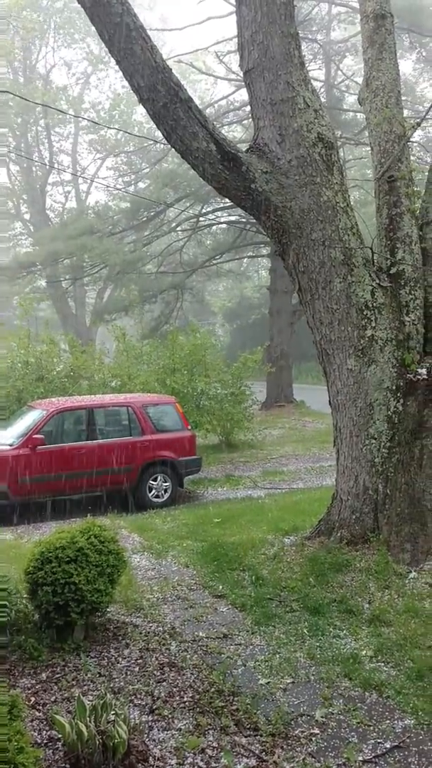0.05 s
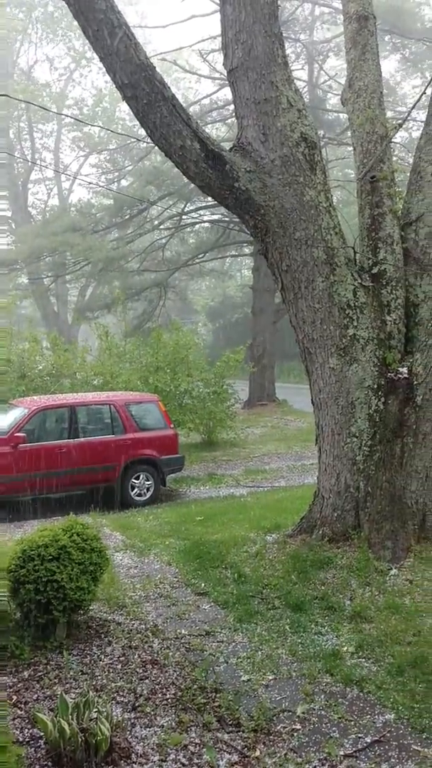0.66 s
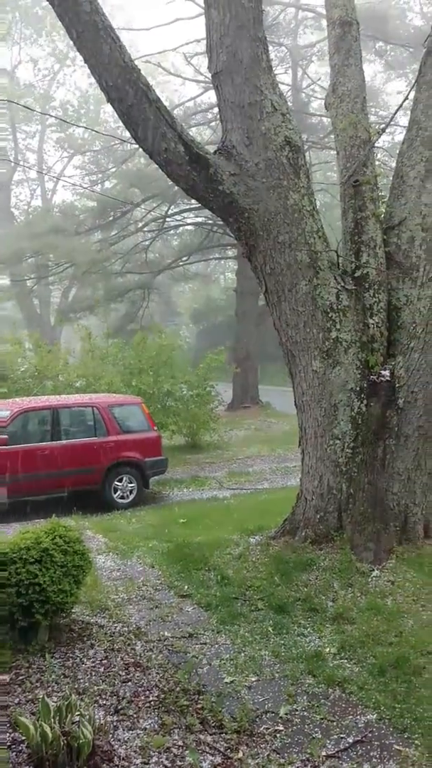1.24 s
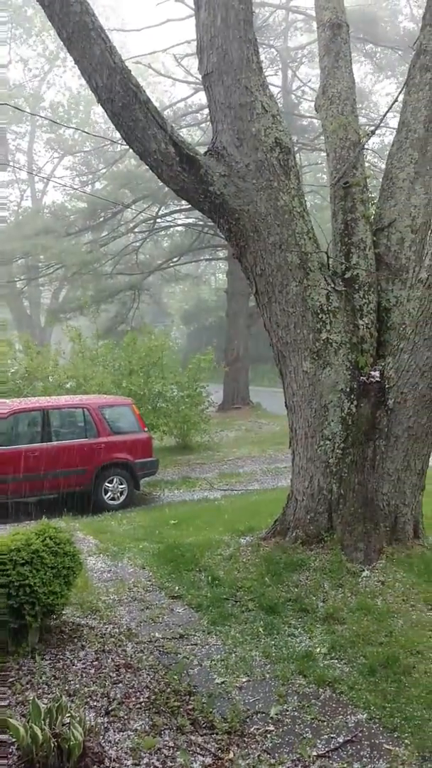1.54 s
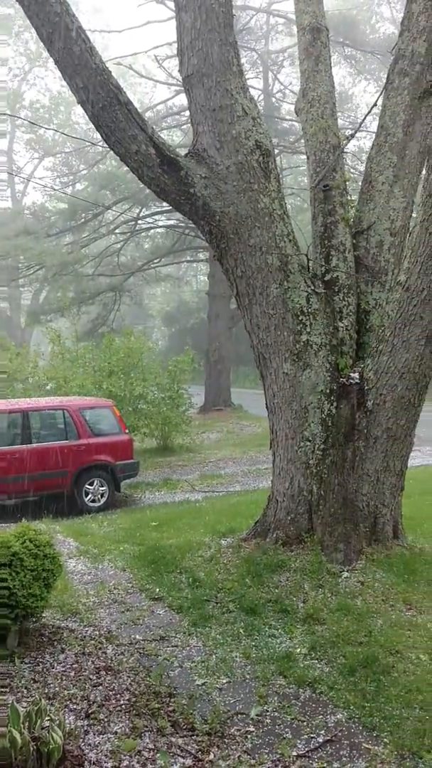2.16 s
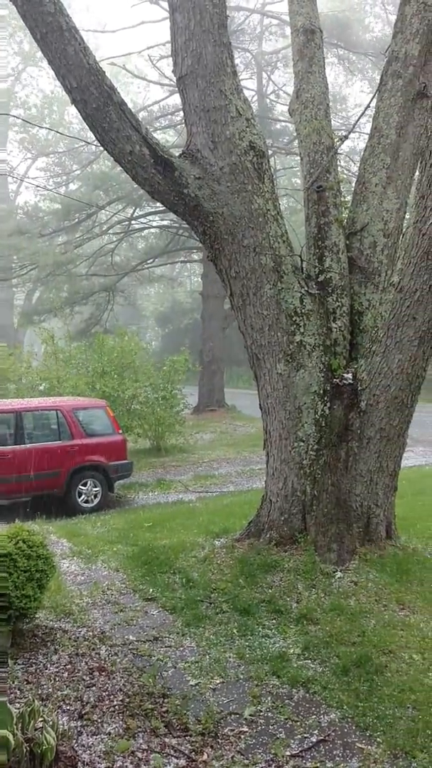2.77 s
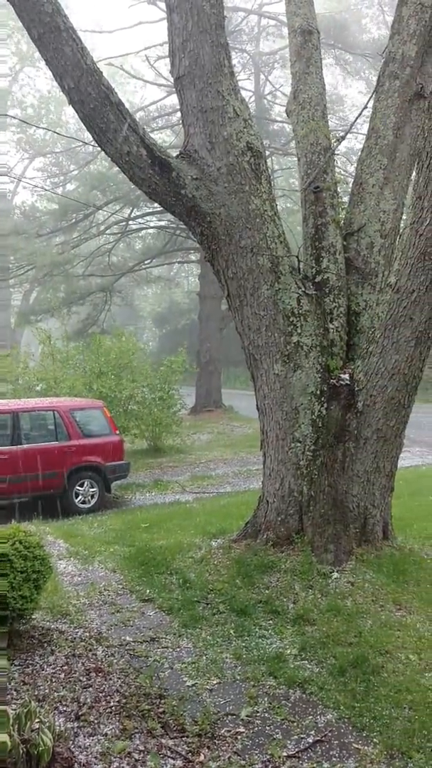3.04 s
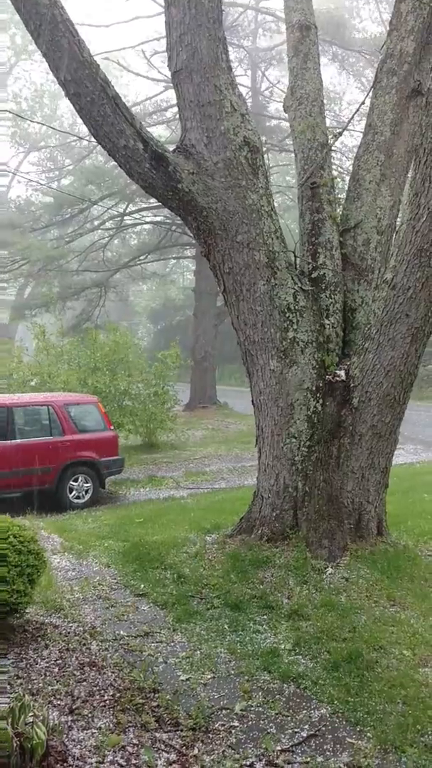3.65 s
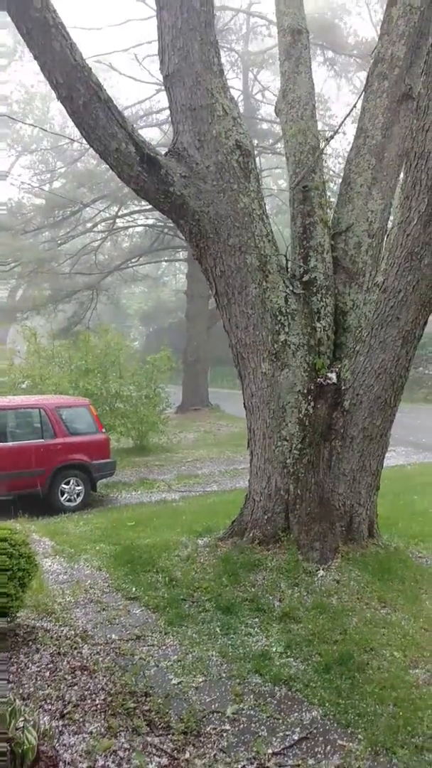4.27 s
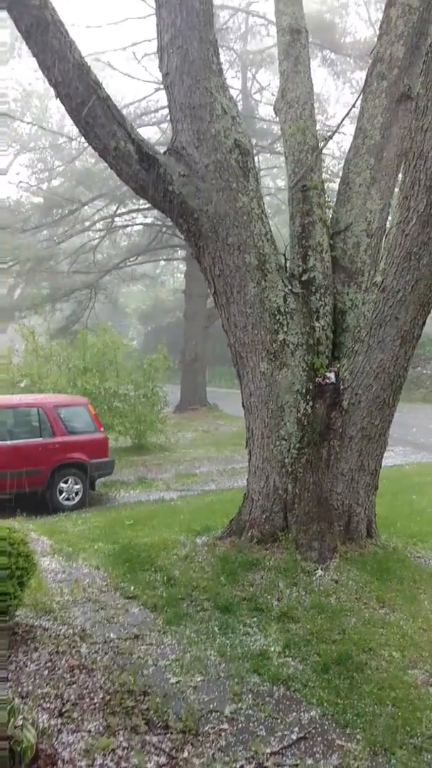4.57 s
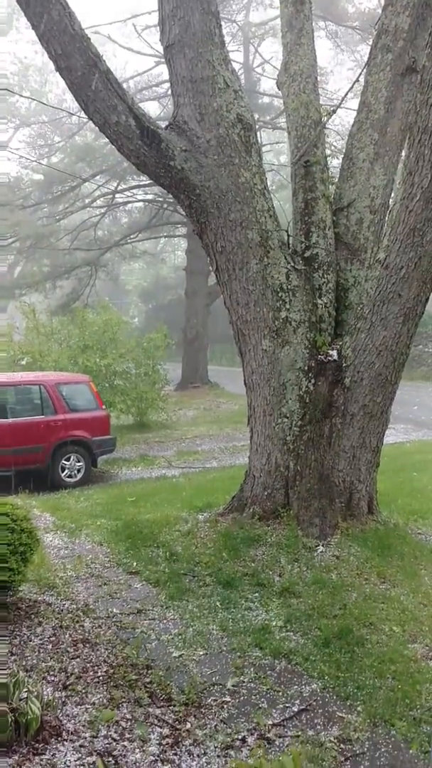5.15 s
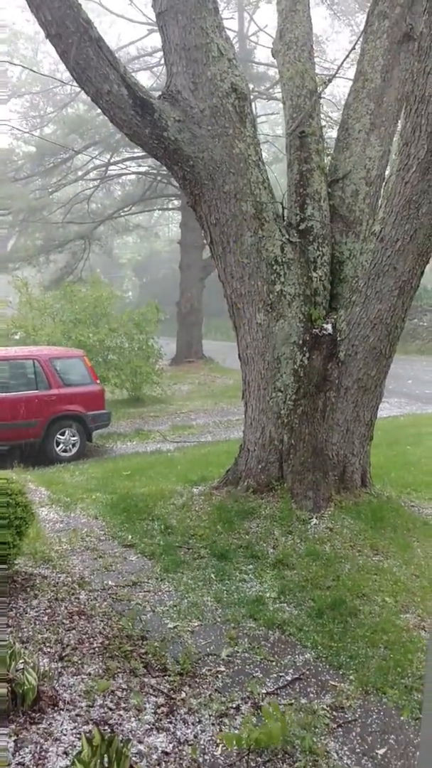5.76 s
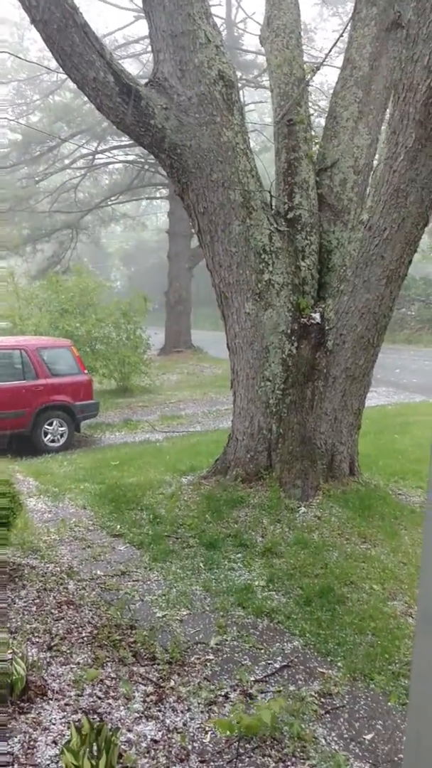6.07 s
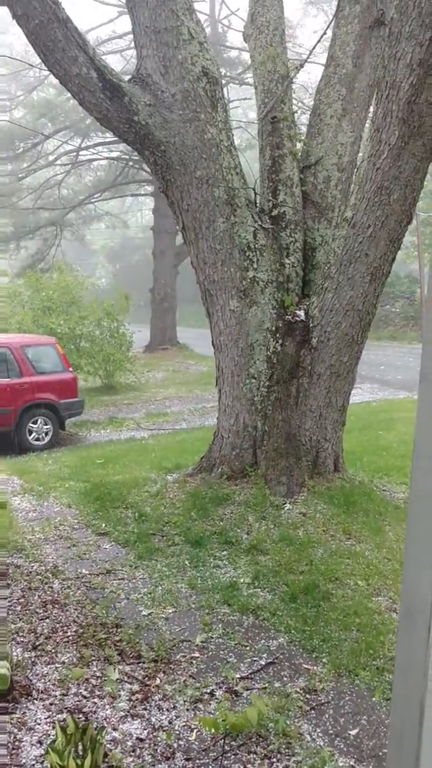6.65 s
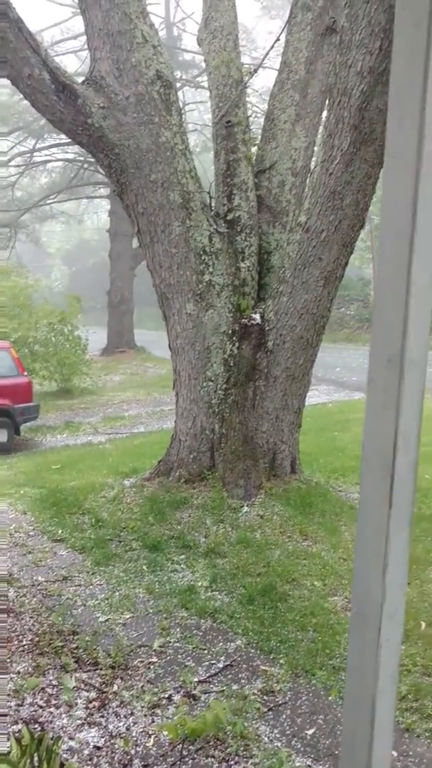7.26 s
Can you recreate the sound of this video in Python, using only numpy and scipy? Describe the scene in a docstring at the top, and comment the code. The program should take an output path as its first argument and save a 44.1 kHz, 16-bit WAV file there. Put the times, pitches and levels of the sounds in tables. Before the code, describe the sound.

A dense hailstorm pours onto a yard and booms on the roof overhead while single hailstones snap sharply against hard surfaces nearby.

```python
"""Heavy hail and rain on a yard, heard from a porch. From the start, countless small hits hiss on leaves,
patter on the ground and drum on the roof, while close stones crack on something hard. Sharp cracks
make the automatic volume control dip, and the downpour slowly swells back. After a second, big stones
also thud on the roof and others knock on something hollow. The roof's boom grows for three seconds as
the microphone comes under it. Near six seconds the biggest stone clinks; at the end the hail eases."""
import sys
import numpy as np
from scipy import signal
from scipy.fft import rfft, irfft, next_fast_len
from scipy.io import wavfile

SR = 44100
rng = np.random.default_rng(int(sys.argv[2]) if len(sys.argv) > 2 else 0)


def unload_wav(signal):
    """Save mono or channel-first audio to the path in sys.argv[1] as 16-bit WAV at rate SR, clipped to [-1, 1]."""
    wavfile.write(
        sys.argv[1],
        SR,
        np.round(np.clip(np.atleast_2d(signal).T, -1, 1) * 32767).astype(np.int16),
    )


N = 331191
SIZE = next_fast_len(N + 4096)
HZ, TIME = np.fft.rfftfreq(SIZE, 1 / SR), np.arange(N) / SR
CONTACT_S = .00036  # a hit peaks this long after it begins
PORT_GAP_S = .000389  # sound's travel time between the microphone's two openings, or ports

# close hailstones: t/s, ring level/dB, f/Hz, snap level/dB, click level/dB, side (-1 left, 1 right)
CLOSE_STONES = [(0.152, -26, 1900, -9.5, -12, -1.0), (0.2154, -16.0, 3900, -22.0, -30, 0.1),
                (0.3467, -18.0, 3300, -17, -30, 0.6), (0.7289, -18, 4600, -24.0, -30, -0.3),
                (0.8091, -23, 4600, -24.0, -30, 0.2), (0.8646, -22, 4600, -17, -11.5, 0.8),
                (1.206, -17, 2800, -12, -30, -0.7), (1.2516, -25, 4600, -14, -30, 0.7),
                (1.4433, -23, 4570, -15, -15, 0.8), (1.4614, -19, 4600, -24.0, -32, 0.5),
                (1.8788, -15, 2800, -24.0, -16, 0.8), (1.9427, -24.0, 7300, -19.0, -10.5, 0.4),
                (1.9876, -20.0, 2800, -18.0, -30, 0.6), (2.1235, -19, 3900, -24.0, -30, 0.2),
                (2.1633, -21, 4600, -24.0, -30, 0.8), (2.2777, -13.5, 4600, -21.0, -25, 0.8),
                (2.307, -17, 4600, -24.0, -30, 0.4), (2.4174, -15, 4600, -10.0, -12.5, 0.5),
                (2.6017, -22.0, 5400, -15, -30, 0.8), (2.6946, -13, 6300, -27, -13.5, 0.8),
                (2.7882, -7.5, 3900, -19, -11, 0.5), (3.0792, -21, 3300, -23.0, -30, -0.5),
                (3.1077, -15, 7300, -9, -9, 0.1), (3.7443, -17.0, 5400, -24.0, -30, 0.8),
                (3.78, -22, 5400, -14.0, -10.5, 0.4), (3.797, -16, 2800, -24.0, -30, 0.5),
                (3.9071, -22, 4600, -26, -30, 0.0), (4.427, -18, 4600, -24.0, -30, 0.2),
                (4.9786, -17, 6300, -28, -15.5, 0.5), (5.0515, -28, 5400, -27, -16, 0.3),
                (5.1785, -17, 3920, -24, -30, 0.4), (5.3996, -14, 5400, -21, -10, 0.7),
                (5.4644, -13, 3900, -12, -30, 0.2), (5.7736, -11, 3900, -18.0, -25, 0.5),
                (5.7874, -16, 3930, -17, -30, 0.8), (6.1392, -5.5, 4520, -12, -9.5, 0.3),
                (6.362, -23.0, 1900, -15, -30, 0.4), (6.6143, -18.0, 3870, -14, -25, 0.7),
                (6.7348, -18, 5400, -11.5, -13.5, 0.7), (7.0047, -16, 3210, -24.0, -30, 0.8),
                (7.0364, -18.0, 2800, -12, -33, -0.7), (7.0681, -18, 1910, -24.0, -30, 0.9),
                (7.0703, -16, 1900, -24.0, -30, 1.0), (7.0762, -24.0, 7300, -24.0, -14.5, -0.4),
                (7.097, -17, 5370, -18, -11.5, 0.7), (7.2865, -24, 5400, -16, -16, 0.5),
                (7.2962, -14.0, 3300, -7, -8, 0.3), (7.3496, -22, 1900, -22.0, -30, -0.5)]
def cracks():
    """Stones crack on something hard close by, each from its own side."""
    mix = np.zeros((2, N))
    for start_s, *settings, side in CLOSE_STONES:
        for port, sound in zip(mix, placed(stone(*settings), side)):
            add(port, start_s, sound)
    return mix

# the bright snap of ice: f/Hz, level/dB
SNAP_TONES = [(6500, -2), (8800, -2.5), (11000, -5)]
def stone(ring_db, hz, snap_db, click_db, count=14, echo_s=0.0052, scatter_t60=0.2):
    """One blow makes a snap and a short ring; the wall echoes it and the porch scatters it."""
    t = np.arange(SR // 10) / SR
    t60 = 0.0086 * (5300 / hz) ** 0.9  # seconds to fade by 60 dB: low notes last longer
    octaves = 0.553 * np.linspace(-1.7, 1.7, count) + 0.024 * rng.standard_normal(count)
    tones = np.minimum(hz * 2 ** octaves, 12000)
    ring = sum(np.cos(2 * np.pi * (f * (t - CONTACT_S) + 0.15 * rng.standard_normal())) for f in tones)
    ring *= np.sqrt(2 / count) * gain_of(ring_db - 60 * t / t60) * (1 - np.exp(-t / .00012))
    ring += sum(snap(t, snap_db + db, hz=f, width_s=0.00013) for f, db in SNAP_TONES)
    scatter = rng.standard_normal(len(t)) * gain_of(-60 * t / scatter_t60)
    tail = signal.fftconvolve(ring, scatter / np.linalg.norm(scatter))[:len(t)]
    add(ring, echo_s, gain_of(-13) * ring)
    click = snap(t, click_db, hz=19180, width_s=.00004)  # this is what trips the volume control
    return ring + gain_of(-2) * tail + click

def snap(t, db, hz, width_s):
    """A touch so brief that it holds only a few wiggles."""
    from_peak = t - CONTACT_S
    return gain_of(db) * np.exp(-.5 * (from_peak / width_s) ** 2) * np.cos(2 * np.pi * hz * from_peak)

# notes of the surface under the biggest stone: f/Hz, level/dB, fade time/s
CLINK_TONES = [(2900, -5, 0.035), (3070, -7, 0.022), (6030, -5, 0.012), (8250, -6, 0.035)]
def clink(level_db):
    """The biggest stone sets its surface ringing, short and clear."""
    t = np.arange(SR // 10) / SR
    return sum(gain_of(level_db + db - 60 * t / t60) * np.sin(2 * np.pi * hz * t)
               for hz, db, t60 in CLINK_TONES)

# hits on something hollow: t/s, level/dB, f/Hz, fade time/s
HOLLOW_HITS = [(1.2748, -14, 1100, .015), (2.787, -8, 1050, .007), (2.8304, -12, 1230, 0.03),
               (2.8385, -11, 1650, 0.026), (2.9685, -15, 3060, 0.04), (3.746, -15.5, 570, 0.044),
               (4.59, -18.5, 780, 0.066), (4.612, -19, 620, 0.086), (4.746, -14.5, 486, 0.044),
               (5.016, -11.5, 496, 0.072), (7.0372, -21, 1870, 0.031), (7.0674, -18, 480, 0.018),
               (7.2967, -10, 1150, 0.0074), (7.3676, -15, 1100, .02), (7.372, -17, 930, 0.046)]
# its notes: multiple of the pitch, level/dB
HOLLOW_TONES = [(1, -1), (1.36, -5), (2.15, -13)]
def knocks(rise_s=0.00016):
    """Stones ring a few clear notes in something hollow; the higher ones die sooner."""
    t = np.arange(SR // 8) / SR
    mix = np.zeros(SIZE)
    for start_s, db, hz, t60 in HOLLOW_HITS:
        ring = sum(gain_of(db + tone_db - 60 * t * np.sqrt(ratio) / t60)
                   * np.cos(2 * np.pi * hz * ratio * t) for ratio, tone_db in HOLLOW_TONES)
        add(mix, start_s, ring * (1 - np.exp(-t / rise_s)))
    return mix

# big stones on the roof: t/s, level/dB, f/Hz
ROOF_HITS = [(1.372, -16, 294), (1.414, -21, 220), (1.444, -21, 298), (1.584, -16, 270), (1.624, -15, 302),
             (1.66, -14.5, 278), (1.746, -25, 227), (1.783, -22, 220), (1.814, -22, 249), (1.843, -18, 278),
             (2.061, -15, 312), (2.749, -16, 230), (3.137, -16, 272), (3.484, -21, 196), (3.516, -14, 196),
             (3.676, -15, 175), (3.709, -16, 214), (3.741, -13.5, 225), (4.732, -17, 227),
             (4.978, -12.5, 173), (5.01, -10, 263), (5.019, -13, 156), (5.229, -13.5, 275),
             (5.896, -15, 248), (6.312, -9.5, 158), (6.503, -14, 218), (6.824, -18, 230),
             (7.063, -17.5, 252), (7.159, -22, 211), (7.25, -21, 218)]
def thuds(t60=0.093, rise_s=0.0022):
    """Each big stone shakes three low, fast-fading notes out of the roof."""
    t = np.arange(SR // 5) / SR
    mix = np.zeros(SIZE)
    for start_s, db, hz in ROOF_HITS:
        ring = sum(np.sin(2 * np.pi * (hz * ratio * t + rng.random())) for ratio in (.74, .98, 1.35))
        add(mix, start_s, ring * gain_of(db - 60 * t / t60) * (1 - np.exp(-t / rise_s)))
    return mix

# how hard the hail falls: t/s, level/dB
HAIL_STRENGTH = [(0.0, 9), (0.8, -1), (0.95, 3), (1.66, 6), (3.42, -1.5), (3.5, 5.5), (3.75, 4.5),
                 (3.88, -4), (4.0, 0.5), (4.84, 1), (5.0, 6), (5.12, 2.5), (6.12, -3), (6.2, -6.5),
                 (6.34, 2.5), (6.62, -1.5), (6.83, 2.5), (6.92, -6), (7.5, -8)]
def downpour():
    """The roof follows the bursts of hail most, the ground a little; the leaves only flicker."""
    hail_db = np.interp(TIME, *np.transpose(HAIL_STRENGTH))
    clumps = flurry(top_hz=35.5)
    return roof(hail_db) + ground(hail_db, clumps) + leaves(clumps)

# the roof's dull tone: f/Hz, level/dB
ROOF_COLOUR = [(15, -51), (45, -33), (80, -16.5), (130, -0.5), (220, -0.5), (325, -0.5), (400, -7),
               (500, -11.5), (900, -36.5)]
def roof(hail_db, boom_hz=205, under_roof_s=3):
    """Hail drums overhead; the boom grows with harder hail and as the microphone comes under the roof."""
    bumps = impacts(per_s=380, spread_db=1.1, low_hz=125, high_hz=393, ringing=8.8)
    drumming = shower(ROOF_COLOUR, -26 + 0.7 * hail_db + 0.95 * flurry(top_hz=15), bumps, near_db=-5.5)
    boom = irfft(rfft(drumming, SIZE) / (1 + (HZ / boom_hz) ** 10), SIZE)[:, :N]
    boom_db = np.interp(TIME, [0, under_roof_s], [-8, 0]) + 0.21 * hail_db
    return drumming + boom * (gain_of(boom_db) - 1)

# the ground's middle tone: f/Hz, level/dB
GROUND_COLOUR = [(250, -32), (390, -7.5), (460, 2), (680, 1.5), (1100, -3), (1700, -5.5), (2200, -10.5),
                 (2900, -43), (6000, -60)]
def ground(hail_db, clumps):
    """Hail and rain patter on the yard."""
    pats = impacts(per_s=900, spread_db=3, low_hz=462, high_hz=2250, ringing=4.1)
    return shower(GROUND_COLOUR, -25 + 0.24 * hail_db + 0.33 * clumps, pats, near_db=-5.5)

# the bright tone of leaves and grass: f/Hz, level/dB
LEAF_COLOUR = [(1200, -26.5), (2000, -3.5), (2400, -1.5), (2850, -1.9), (3200, -1.26), (4000, -3.5),
               (6000, -5), (8000, -7), (10000, -11), (12000, -15), (13000, -16.5), (15800, -30.5)]
def leaves(clumps):
    """Tiny hits hiss on leaves and grass; a few on the nearby path ping more brightly."""
    ticks = impacts(per_s=1100, spread_db=5.5, low_hz=2160, high_hz=9500, ringing=1)
    pings = impacts(per_s=98, spread_db=6, low_hz=3500, high_hz=12000, ringing=2.5) * HZ / (HZ + 7000)
    return shower(LEAF_COLOUR, -22.5 + 0.62 * clumps, ticks + gain_of(-7) * pings, near_db=-8.5)

def shower(colour, level_db, near, near_db):
    """Far and near hits on one surface take on its tone."""
    spectrum = (wash() + gain_of(near_db) * near) * gain_of(curve(colour))
    return evened(irfft(spectrum, SIZE)[:, :N]) * gain_of(level_db)

def impacts(per_s, spread_db, low_hz, high_hz, ringing, count=12):
    """Spectrum of nearer hits, mostly small, on patches that each have their own side and note."""
    mix, power = np.zeros((2, len(HZ)), complex), 1e-9
    for side, hz in zip(rng.permutation(np.linspace(-1, 1, count)), np.geomspace(low_hz, high_hz, count)):
        size = np.minimum(rng.exponential(1, SIZE), 4.5)
        lands = rng.random(SIZE) < per_s / count / SR
        clicks = lands * rng.choice([-1, 1], SIZE) * gain_of(spread_db * size)
        ring = 1 / (1 + 1j * ringing * ((HZ + 1) / hz - hz / (HZ + 1)))
        mix += at_ports(evened(rfft(clicks)) * ring, side)
        power = power + abs(ring) ** 2
    return mix / np.sqrt(power)

def wash():
    """Spectrum of countless far hits blurred into noise; only the bass is alike at both ports."""
    a, b, c, d = rng.standard_normal((4, len(HZ)))
    left, alike = a + 1j * b, np.sinc(2 * HZ * PORT_GAP_S)
    right = alike * left + np.sqrt(1 - alike ** 2) * (c + 1j * d)
    return evened(np.array([left, right]))

def flurry(top_hz, count=30):
    """A random wobble: the stones come down in clumps."""
    t = TIME[::128]
    waves = sum(np.sin(2 * np.pi * (f * t + rng.random()))
                for f in np.geomspace(top_hz / 10, top_hz, count))
    return np.interp(TIME, t, evened(waves))

def gain_of(db):
    """Turns decibels into a multiplier."""
    return 10 ** (np.asarray(db) / 20)

def evened(x):
    """Scales to an average power of 1."""
    return x / np.sqrt(np.mean(abs(x) ** 2) + 1e-20)

def curve(points):
    """Joins (f/Hz, value) points into a value for every frequency."""
    f, value = np.transpose(points)
    return np.interp(np.log(HZ + 1), np.log(f + 1), value)

def add(mix, start_s, sound):
    """Mixes a sound in at its start time."""
    part = mix[max(round(start_s * SR), 0):][:len(sound)]
    part += sound[:len(part)]

def at_ports(spectrum, side, hz=HZ):
    """Sound from one side reaches the nearer port first."""
    lag = np.exp(-1j * np.pi * hz * PORT_GAP_S * np.clip(side, -1, 1))
    return np.array([spectrum * lag, spectrum * lag.conj()])

def placed(sound, side, size=8192):
    """A short sound as the two ports hear it."""
    return irfft(at_ports(rfft(sound, size), side, np.fft.rfftfreq(size, 1 / SR)), size)

def scene():
    """Single stones over the downpour, as they reach the two ports."""
    cracking, close = cracks(), knocks()
    add(close, 6.1392, clink(level_db=-9.5))
    overhead = rfft(thuds()) * gain_of(curve(ROOF_COLOUR))
    hits = at_ports(rfft(close), side=0.21) + at_ports(overhead, side=0.13)
    return cracking + irfft(hits, SIZE)[:, :N] + downpour()

def volume_control(x, threshold_db=-24.5, recovery_db_per_s=9, start_dip_db=10, least_dip_db=3):
    """Sharp treble peaks turn the volume down fast; it creeps back at a steady rate, up to a limit."""
    treble = np.fft.ifft(rfft(x, SIZE) * (HZ > 16200), SIZE)[:, :N]
    over_db = 20 * np.log10(2 * abs(treble).max(0) + 1e-9) - threshold_db
    creep_db = recovery_db_per_s * TIME
    held_db = np.maximum.accumulate(np.maximum(over_db + creep_db, start_dip_db))
    dip_db = np.maximum(held_db - creep_db, least_dip_db)
    lag = np.exp(-1 / (0.0079 * SR))  # reacts in about 8 ms
    smooth_db = signal.lfilter([1 - lag], [1, -lag], dip_db - start_dip_db) + start_dip_db
    return x / gain_of(smooth_db)

# how much more open the right port is: f/Hz, level/dB
RIGHT_PORT_LIFT = [(40, -3), (130, 3), (450, 3), (1000, 4.5), (2200, 6.5), (4000, 4), (8000, -1),
                   (14000, 0)]
# how much of the other port is taken away: f/Hz, share (0-1)
OTHER_PORT_SHARE = [(60, 0.76), (400, 0.66), (1200, 0.82), (2500, 0.79), (3900, 0.4), (5200, 0.61),
                    (6500, 0.5), (7800, 0.65), (9000, 0.4), (12000, 0.64)]
# how late that share comes: f/Hz, delay/s
OTHER_PORT_DELAY = [(2500, .000400), (4200, .000388)]
def widen(x):
    """Each channel subtracts a late copy of the other port, which widens the stereo."""
    share = np.clip(curve(OTHER_PORT_SHARE), 0, .96)
    turn = 2 * np.pi * HZ * curve(OTHER_PORT_DELAY)
    openness = gain_of(curve(RIGHT_PORT_LIFT) * np.array([[-.5], [.5]]))
    ports = rfft(x, SIZE) * openness
    pair = ports - share * np.exp(-1j * turn) * ports[::-1]
    # sound from all around keeps its tone
    power = (openness ** 2).mean(0) * (1 + share ** 2) - 2 * share * np.sinc(turn / np.pi) * np.cos(turn)
    return irfft(pair / np.sqrt(power), SIZE)[:, :N]

def record(dry):
    """Controls the volume, widens the stereo and cuts the highest treble."""
    low_pass = signal.firwin(511, 15850, window=("kaiser", 9), fs=SR)
    return signal.oaconvolve(widen(volume_control(dry)), low_pass[None], "same")

dry = scene()
out = record(dry)
unload_wav(out)
```